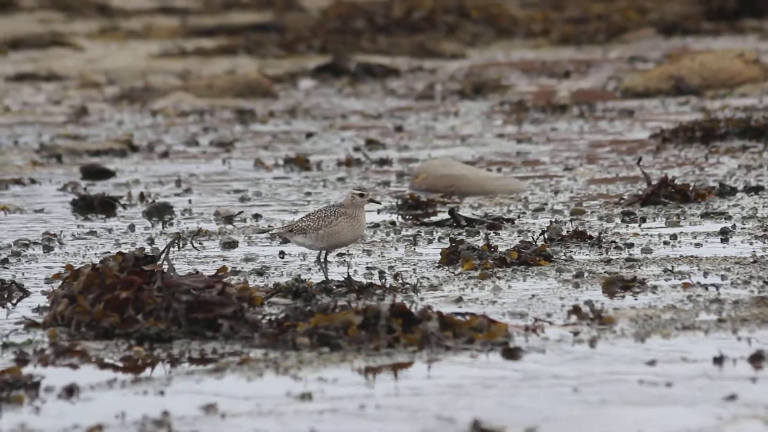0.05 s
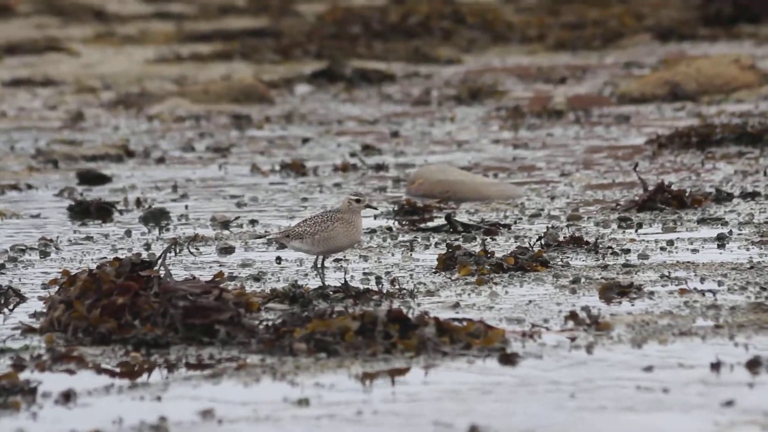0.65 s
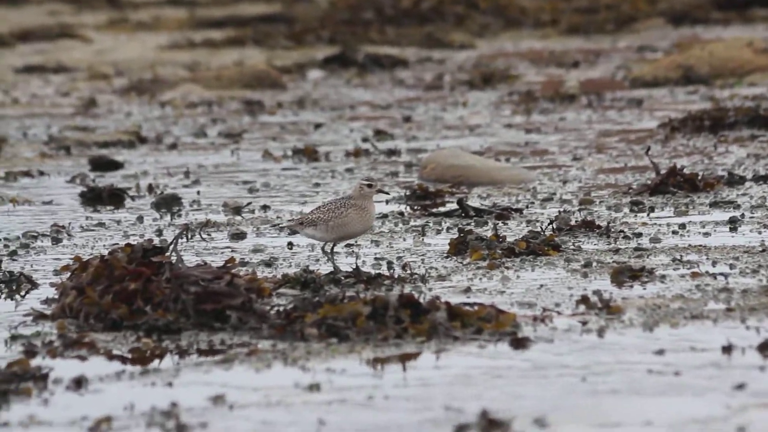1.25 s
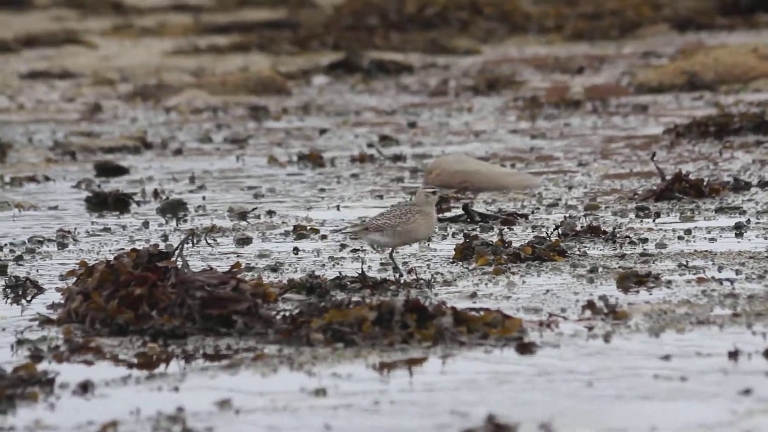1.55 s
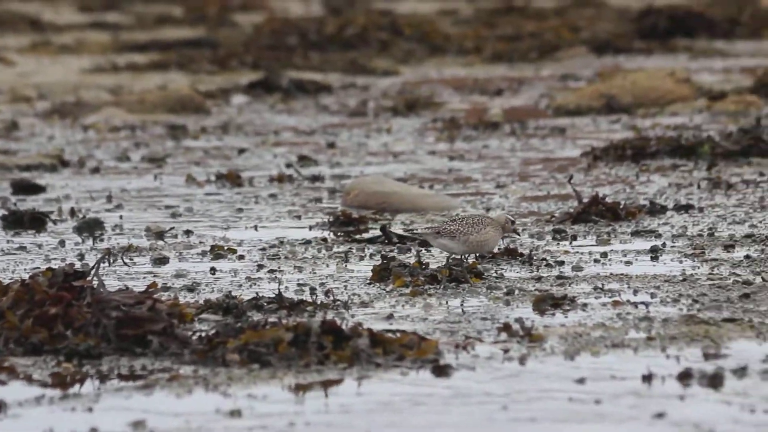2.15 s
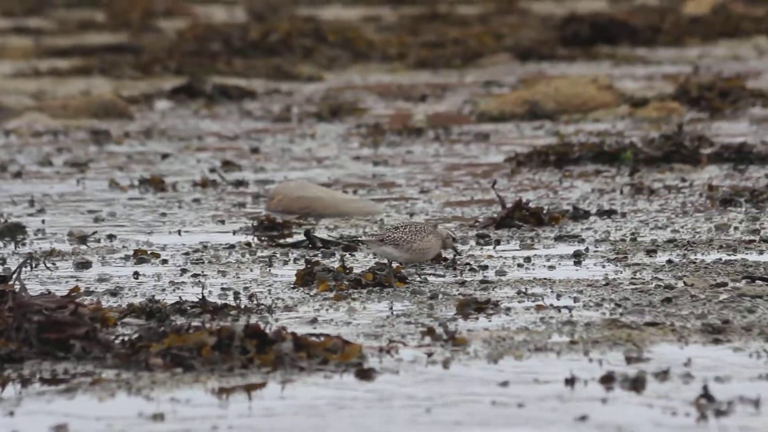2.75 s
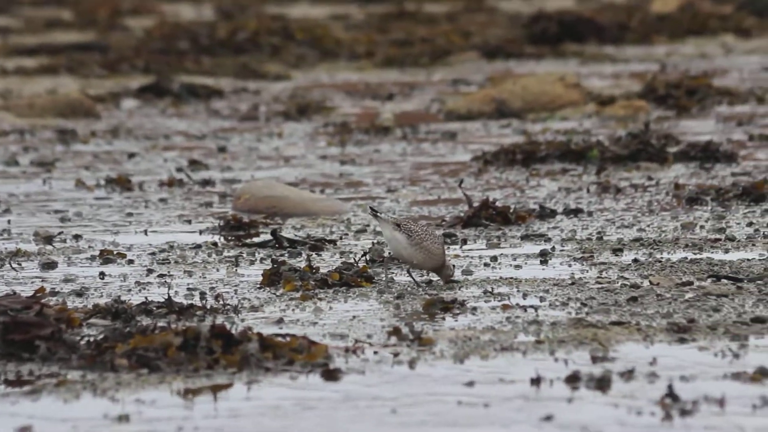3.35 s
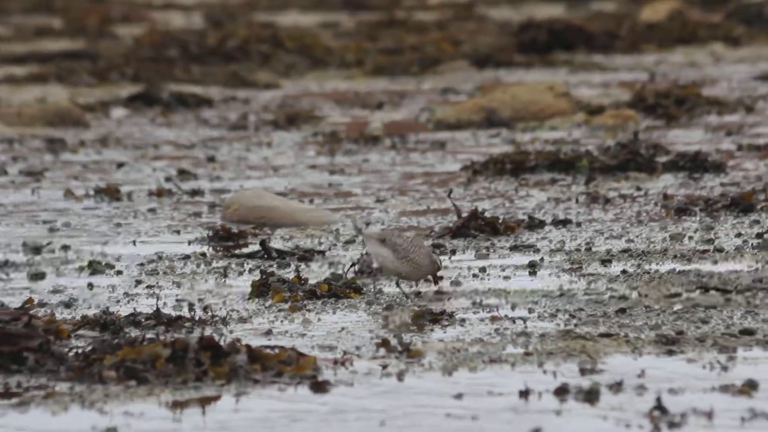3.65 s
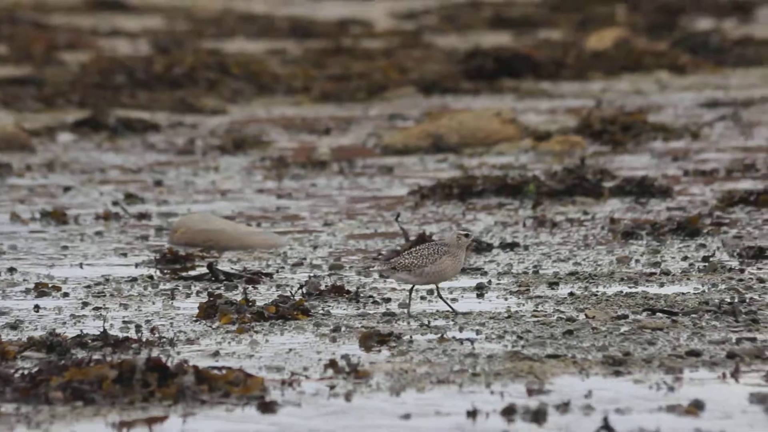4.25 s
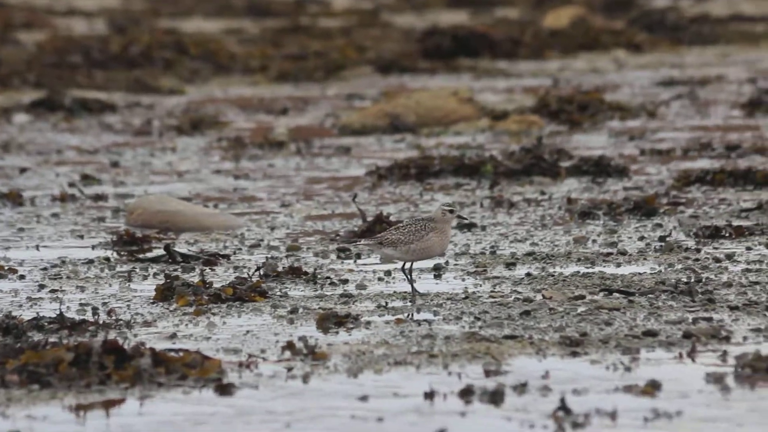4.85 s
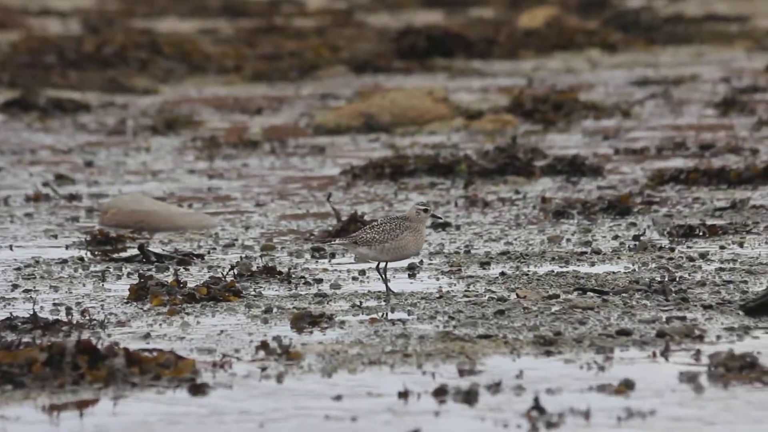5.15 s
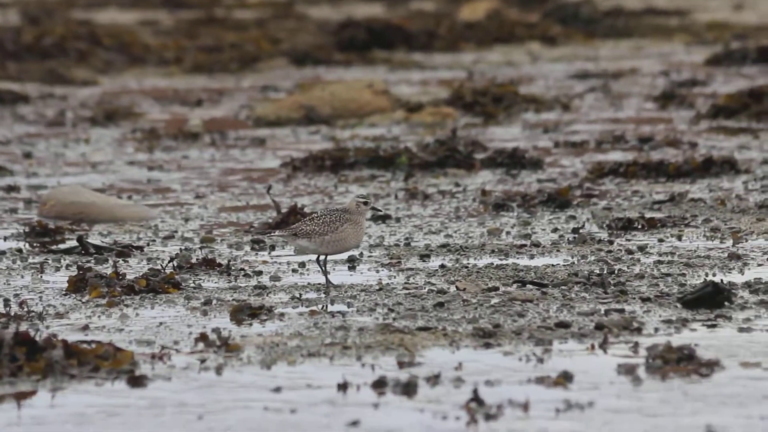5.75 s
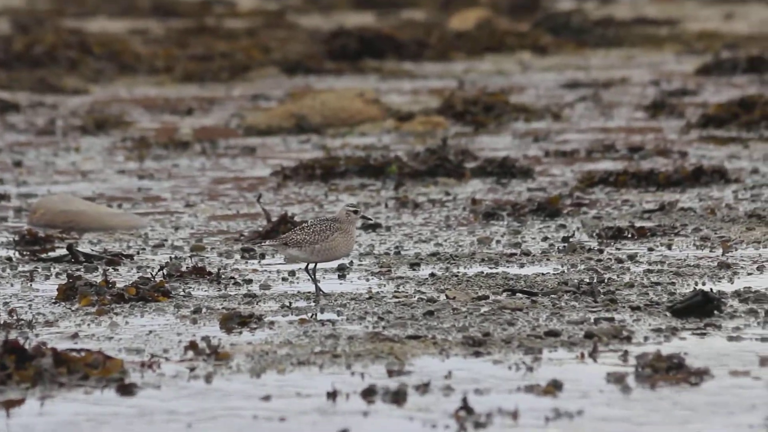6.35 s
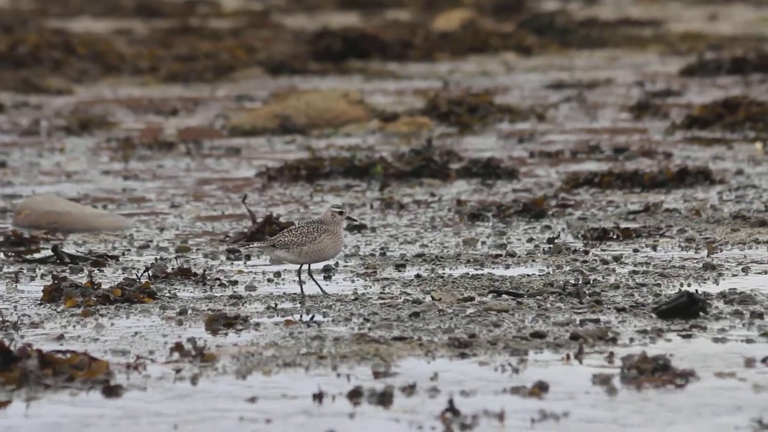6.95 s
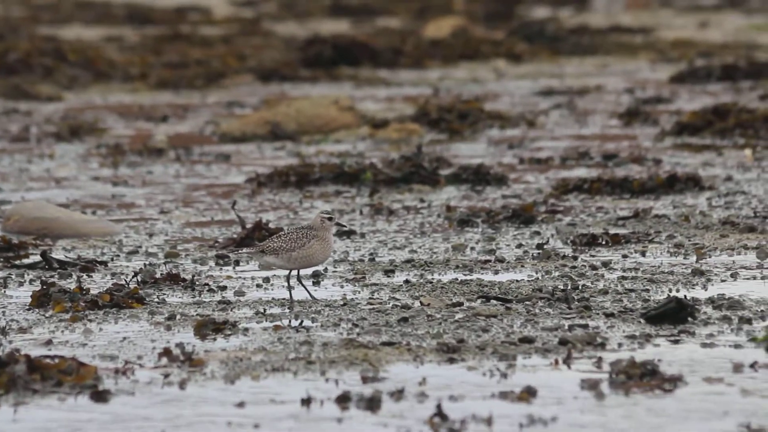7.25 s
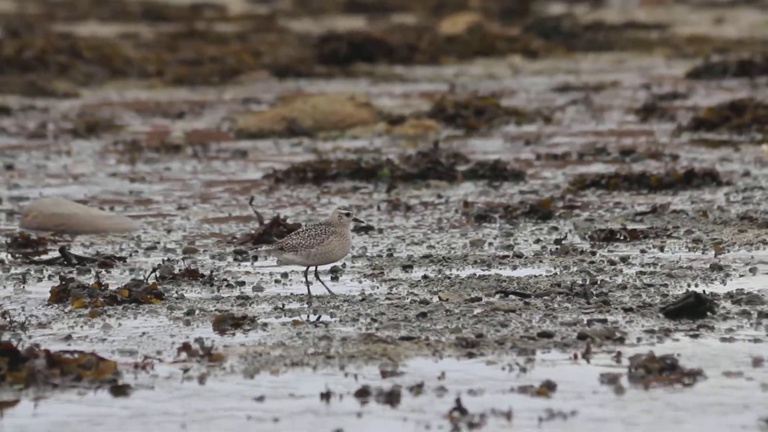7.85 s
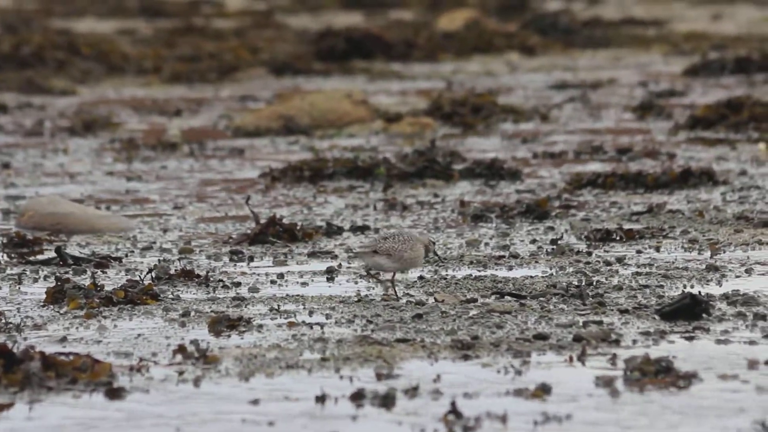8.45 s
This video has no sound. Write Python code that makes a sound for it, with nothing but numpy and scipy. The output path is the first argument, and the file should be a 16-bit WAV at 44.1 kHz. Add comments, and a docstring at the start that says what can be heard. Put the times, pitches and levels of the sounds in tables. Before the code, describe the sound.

Wind buffets a microphone on an open tidal flat, making a low, uneven rumble with ragged thumps. After an opening gust it eases, then returns in repeated blasts, the hardest briefly overloading the microphone. From a little before halfway, shorebirds give thin, almost pure whistles behind the wind: one long and wavering, one rising, then short slurs and two-part calls. Faint distant surf and hiss continue underneath.

```python
"""Gusts of wind buffet a camera microphone on an open tidal flat.
Turbulence makes a low rumble, and each passing eddy is one push and pull on the diaphragm.
The hardest eddies overload the camera, whose limiter ducks the whole scene for a moment.
Behind the wind, shorebirds whistle in thin, nearly pure tones that flutter in the moving air,
above the steady wash of distant surf and the microphone's faint hiss."""
import sys
import numpy as np
from scipy import signal
from scipy.fft import rfft, irfft, next_fast_len
from scipy.io import wavfile
from scipy.ndimage import map_coordinates

SR = 44100
rng = np.random.default_rng(int(sys.argv[2]) if len(sys.argv) > 2 else 0)


def unload_wav(signal):
    """Save mono or channel-first audio to the path in sys.argv[1] as 16-bit WAV at rate SR, clipped to [-1, 1]."""
    wavfile.write(
        sys.argv[1],
        SR,
        np.round(np.clip(np.atleast_2d(signal).T, -1, 1) * 32767).astype(np.int16),
    )


N = 384552
TIME = np.arange(N) / SR


def amp(db):
    """Amplitude ratio: a factor of ten for every 20 dB."""
    return 10 ** (np.asarray(db) / 20)


def curves(rows):
    """Linear interpolation: one value per sample for each column after the time."""
    times, *columns = np.transpose(rows)
    return [np.interp(TIME, times, column) for column in columns]


def wobble(rate):
    """Random modulation: a smooth curve through `rate` Gaussian knots a second."""
    return map_coordinates(rng.standard_normal(int(N * rate / SR) + 4), [TIME * rate])


def filtered(x, response):
    """Linear filtering: the spectrum of x is multiplied by a frequency response."""
    size = next_fast_len(N + SR // 2)
    return irfft(rfft(x, size) * response(np.fft.rfftfreq(size, 1 / SR)), size)[:N]


def noise(spectrum):
    """Spectral shaping: white noise coloured by (frequency [Hz], level [dB]) points, at rms 1."""
    points_hz, db = np.transpose(spectrum)
    white = rng.standard_normal(N)
    coloured = filtered(white, lambda hz: amp(np.interp(np.log(hz + 1), np.log(points_hz), db)))
    return coloured / np.sqrt(np.mean(coloured ** 2) + 1e-20)


def hiss():
    """Self-noise: the microphone adds a steady, nearly white floor."""
    # noise floor spectrum: (frequency [Hz], relative density [dB])
    spectrum = [(100, 0), (4000, -0.3), (9000, -1), (12000, 0.5), (15500, 2.5)]
    return amp(-60.5) * noise(spectrum)


def surf():
    """Incoherent summation: far waves merge into broadband noise that barely swells."""
    # spectrum of the sea: (frequency [Hz], relative density [dB])
    spectrum = [(20, 0), (100, -21.5), (250, 7), (450, 2), (700, -3.5), (1000, 0), (1400, 0), (1900, -5),
                (2600, -10), (4000, -19), (7000, -26), (15000, -36.5)]
    return amp(-45 + 0.28 * wobble(2.086) + 0.7 * wobble(20)) * noise(spectrum)


def whistle(note, partials, ramp_s=0.0065):
    """Amplitude modulation: moving air makes each partial of a wavering tone flutter in its own way."""
    hz, db = curves(note)
    gate = np.clip(np.minimum(TIME - note[0][0], note[-1][0] - TIME) / ramp_s, 0, 1)
    on = gate > 0
    wavering_hz = hz * (1 + 0.0044 * wobble(120))
    phase = 2 * np.pi * np.cumsum(wavering_hz[on]) / SR
    tone = np.zeros(N)
    tone[on] = sum(amp(level + 0.79 * wobble(35)[on]) * np.sin(k * phase) for k, level in partials)
    return np.sqrt(2) * gate * amp(db) * tone


def slur(start, end, first_hz, last_hz, db, edge_db=7):
    """Linear glide: the (time [s], pitch [Hz], level [dB]) path of a note that swells, holds and fades."""
    progress = np.array([0, 0.35, 0.75, 1])
    times = start + progress * (end - start)
    hz = first_hz + progress * (last_hz - first_hz)
    return np.transpose([times, hz, [db - edge_db, db, db, db - edge_db]])


def yodel(start, flip, end, low_db, high_db, octave_db, flip_s=0.01, slope_db_per_s=32):
    """Register break: the pitch sags, jumps up where the level peaks, and sags again."""
    times = np.r_[np.linspace(start, flip - flip_s / 2, 8), np.linspace(flip + flip_s / 2, end, 8)]
    hz = np.r_[np.linspace(1584, 1535, 8), np.linspace(1604, 1560, 8)]
    level_db = np.where(times < flip, low_db, high_db) - slope_db_per_s * np.abs(times - flip)
    return whistle(np.transpose([times, hz, level_db]), partials=[(1, 0), (2, octave_db), (3, -36)])


def birds(decay_s=0.19):
    """Scattering: whistles cross the flat directly, and rocks and weed add a faint diffuse tail."""
    # a long wavering whistle and an upward one: (time [s], pitch [Hz], relative level [dB])
    long_note = [(3.41, 1820, -51), (3.62, 1806, -44), (3.73, 1850, -41), (3.86, 1808, -41),
                 (3.93, 1848, -38), (3.98, 1807, -39), (4.17, 1810, -40), (4.22, 1828, -42),
                 (4.31, 1755, -49)]
    rising_note = [(4.97, 1845, -63), (5.048, 1900, -41), (5.11, 1956, -41.5), (5.17, 2050, -43),
                   (5.26, 2190, -51), (5.38, 2205, -47.5)]
    # short glides: (start [s], end [s], first pitch [Hz], last pitch [Hz], relative level [dB])
    slurs = [(5.58, 5.76, 2010, 1915, -56.5), (6.34, 6.48, 1980, 2125, -47.5),
             (6.965, 7.01, 3840, 3700, -60), (7.55, 7.63, 2085, 2120, -50)]
    split_slur = (3.4, 3.5, 2180, 2218, -53.5)  # a second bird joins the long whistle with a split tone
    # two-register calls: (start [s], flip [s], end [s], low register [dB], high register [dB],
    # octave partial re fundamental [dB])
    yodels = [(6.534, 6.707, 6.945, -34, -38, -22), (7.699, 8.0, 8.14, -49.5, -46.5, -7.5)]
    # partials of three timbres: (frequency / pitch [ratio], relative level [dB])
    pure = [(1, 0), (1.5, -26)]
    clear = [(1, 0), (1.5, -23), (2, -27)]
    split = [(0.894, -1), (0.999, 3), (1.07, -7)]
    calls = whistle(long_note, pure) + whistle(rising_note, clear)
    calls += whistle(slur(*split_slur), split)
    calls += sum(whistle(slur(*row), clear) for row in slurs)
    calls += sum(yodel(*row) for row in yodels)
    t = np.arange(SR // 2) / SR
    tail = rng.standard_normal(len(t)) * amp(-60 * t / decay_s)
    scatter = amp(-19) * signal.fftconvolve(calls, tail / np.linalg.norm(tail))[:N]
    return amp(-2.5) * (calls + scatter)


def wind_strength(rise_db_per_s=402, fall_db_per_s=450):
    """Intermittency: the level in dB is that of the breeze, or of whichever gust stands above it."""
    # light air between gusts: (time [s], relative level [dB])
    breeze = [(0, -31.5), (0.6, -45.5), (0.77, -35), (1.3, -49), (1.75, -39.5), (2.3, -40), (2.5, -44),
              (3.75, -47.5), (4.5, -35), (4.75, -42), (5.2, -30.5), (6.1, -38), (6.85, -33.5), (7.3, -34),
              (7.68, -42.5), (8.72, -30)]
    # gusts arrive fast, build or ease, then drop: (start [s], end [s], first level [dB], last level [dB])
    gusts = [(0.0, 0.135, -23.5, -23), (0.296, 0.505, -21, -16), (2.659, 2.84, -22.5, -28.5),
             (2.95, 3.25, -23, -24.5), (3.32, 3.41, -30, -25), (3.506, 3.597, -28.5, -22.5),
             (3.859, 4.203, -21.5, -16.5), (4.21, 4.419, -24, -29.5), (5.063, 5.39, -29, -16),
             (5.724, 5.804, -20.5, -12.5), (5.886, 5.992, -17, -19.5), (6.358, 6.504, -24, -17.5),
             (7.013, 7.175, -22, -18.5), (7.835, 7.982, -30.5, -23.5), (8.286, 8.727, -27, -26)]
    level_db = curves(breeze)[0] + 2.74 * wobble(14)
    for start, end, first_db, last_db in gusts:
        crest_db = np.interp(TIME, [start, end], [first_db, last_db])
        flank_db = np.maximum(rise_db_per_s * (start - TIME), fall_db_per_s * (TIME - end))
        level_db = np.maximum(level_db, crest_db - np.maximum(flank_db, 0))
    return level_db


def vortex_pulses(times, levels_db, nominal_hz):
    """Bipolar pressure pulses: each passing vortex gives one slightly lopsided push and pull."""
    pressure = np.zeros(N)
    skews = rng.normal(0, 0.38, len(times))
    for time, db, hz, skew in zip(times, levels_db, nominal_hz, skews):
        span = slice(max(int((time - 2 / hz) * SR), 0), max(int((time + 2 / hz) * SR), 0))
        passage = 2 * np.pi * hz * (TIME[span] - time)
        # a steep core with slower skirts, as the vortex nears, passes and leaves
        swell = 1 / np.cosh(0.72 * passage)
        pressure[span] -= amp(db) * swell * np.sin(0.79 * passage + skew)
    return pressure


def small_eddies(strength_db, count=640):
    """Convection: faster air sweeps a loose stream of eddies past sooner, so they sound higher."""
    times = (np.arange(count) + rng.uniform(-1.003, 1, count)) * N / SR / count
    level_spread, pitch_spread = rng.standard_normal((2, count))
    local_db = np.interp(times, TIME, strength_db)
    hz = 160 * np.exp(0.4 * pitch_spread + 0.023 * (local_db + 27))
    return vortex_pulses(times, local_db + 4.5 + 2 * level_spread, hz)


def hard_eddies(whirls_each=2):
    """Scales of turbulence: a large eddy thumps, its tight core snaps, smaller whirls make it ragged."""
    # the hardest eddies: (time [s], relative thump level [dB], nominal frequency [Hz],
    # relative snap level [dB])
    eddies = [(0.024, -8.5, 170, -48), (0.074, -7, 205, -44), (0.119, -12.5, 380, -28),
              (0.255, -16, 237, -39), (0.377, -3, 200, -28), (0.413, -8, 200, -26), (0.457, -6.5, 188, -20),
              (0.489, -3, 135, -31), (0.512, -3.5, 205, -22), (2.673, -4.5, 211, -26.5),
              (2.765, -9.5, 157, -50), (2.833, -13, 210, -48), (3.011, -13, 261, -48),
              (3.088, -8.5, 296, -46), (3.249, -15, 274, -50), (3.568, -15.5, 149, -50),
              (3.895, -5.5, 176, -51), (3.989, -6, 261, -31), (4.047, -1.5, 175, -35),
              (4.141, -4, 280, -29), (4.168, -1, 260, -18), (4.18, 2, 266, -23.5), (4.191, 1.5, 220, -28),
              (4.279, -5, 201, -29.5), (4.307, -2.5, 310, -37), (4.331, -14, 254, -47),
              (4.599, -17.5, 110, -46), (5.072, -14, 228, -48), (5.195, -11.5, 138, -32),
              (5.321, -4, 300, -21), (5.373, -4.5, 336, -24), (5.388, 2, 315, -11), (5.438, -3.5, 202, -28),
              (5.492, -9.5, 189, -30), (5.545, -8, 193, -36), (5.596, -4.5, 230, -19.5),
              (5.728, -6.5, 208, -27.5), (5.758, -4.5, 262, -36), (5.795, -2, 180, -31),
              (5.82, -8.5, 200, -42), (5.866, -10.5, 260, -36), (5.879, 0.5, 211, -24),
              (5.979, -4.5, 274, -45), (6.216, -18, 176, -54), (6.282, -6, 192, -46),
              (6.39, -4.5, 220, -31), (6.452, -9, 140, -46), (6.483, 5, 320, -22), (6.497, 7, 250, -29),
              (6.503, -0.5, 470, -27), (6.628, -13.5, 355, -28.5), (6.76, -15, 275, -47),
              (6.969, -12.5, 189, -55), (7.041, -8.5, 198, -48), (7.087, -11, 159, -32),
              (7.112, -6, 130, -20), (7.132, -12, 267, -43), (7.175, -2, 215, -14), (7.727, -19, 230, -52),
              (8.18, -8.5, 137, -53), (8.365, -8.5, 245, -48), (8.424, -8, 350, -39),
              (8.654, -12.5, 307, -35)]
    times, thump_db, hz, snap_db = np.transpose(eddies)
    thumps = vortex_pulses(times, thump_db + 2.5, hz)
    core_hz = 760 * np.exp(rng.normal(0, 0.22, len(times)))
    snaps = vortex_pulses(times, snap_db + 9.5, core_hz)
    times, thump_db, hz, _ = np.repeat(eddies, whirls_each, axis=0).T
    lag, fineness = rng.uniform(0, 1, (len(times), 2)).T
    whirl_times = times + 0.01376 * (lag - 0.45)
    # finer whirls are weaker and higher
    whirls = vortex_pulses(whirl_times, thump_db - 3 - 13 * fineness, hz * 1.82 ** fineness)
    return thumps + snaps + whirls


def wind(mesh_hz=1150):
    """Turbulent pressure on the diaphragm: rumble and small eddies follow the gusts; hard eddies thump."""
    # spectrum of the rumble: (frequency [Hz], relative density [dB])
    spectrum = [(15, -21), (30, -16), (55, 2), (90, 4), (170, 0), (280, -10.5), (450, -22.5), (700, -32.5),
                (1200, -37.5), (2500, -64)]
    strength_db = wind_strength()
    rumble = amp(strength_db - 6.8 + 3.37 * wobble(30)) * noise(spectrum)
    pressure = rumble + small_eddies(strength_db) + hard_eddies()
    # the mesh over the microphone smooths away the finest whirls
    return filtered(pressure, lambda hz: 1 / np.sqrt(1 + (hz / mesh_hz) ** 8))


def scene():
    """Superposition: wind, birds, surf and hiss add in one channel."""
    return (wind() + birds() + surf() + hiss())[None]


def limiter(x, ceiling_db, deepest_db, release_db_per_s, attack_s):
    """Gain reduction: peaks over the ceiling pull the gain down a moment late; it climbs back steadily."""
    over_db = np.clip(20 * np.log10(np.abs(x) + 1e-9) - ceiling_db, 0, deepest_db)
    climb_db = release_db_per_s * TIME
    cut_db = np.maximum.accumulate(over_db + climb_db) - climb_db
    pole = np.exp(-1 / (attack_s * SR))
    return x * amp(-signal.lfilter([1 - pole], [1, -pole], cut_db))


def record(dry, band_limit_hz=15830):
    """Overload: the camera limits, saturates at full scale and passes nothing above its band limit."""
    limited = limiter(dry[0], ceiling_db=-4.4, deepest_db=8, release_db_per_s=39, attack_s=0.0028)
    saturated = np.clip(limited, -1, 1)
    return filtered(saturated, lambda hz: hz < band_limit_hz)[None]


dry = scene()
out = record(dry)
unload_wav(out)
```